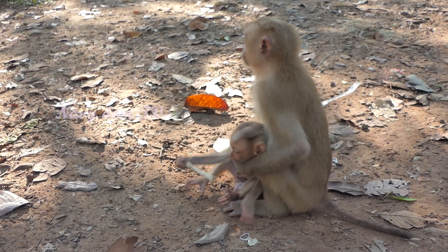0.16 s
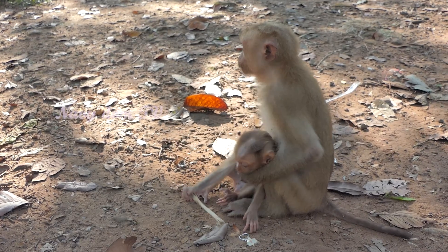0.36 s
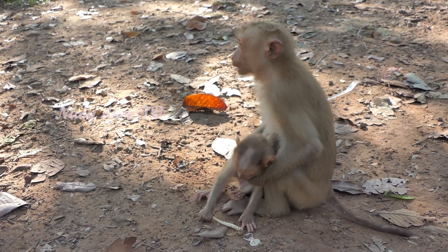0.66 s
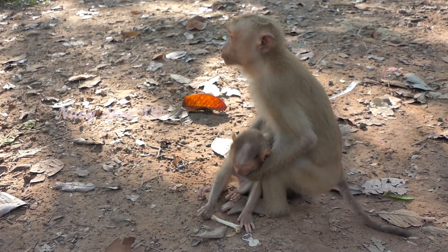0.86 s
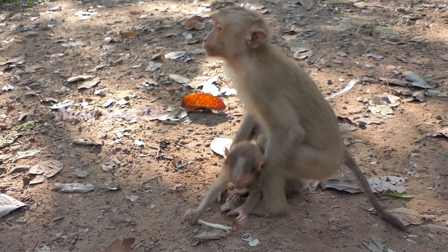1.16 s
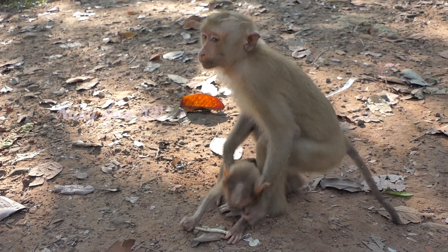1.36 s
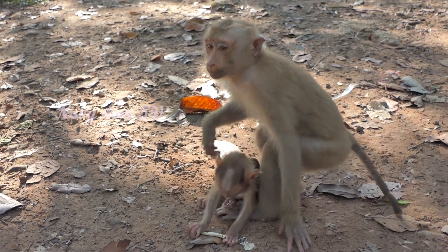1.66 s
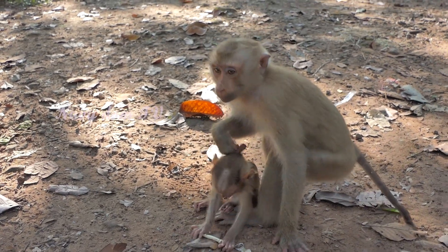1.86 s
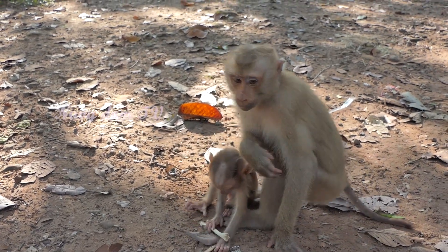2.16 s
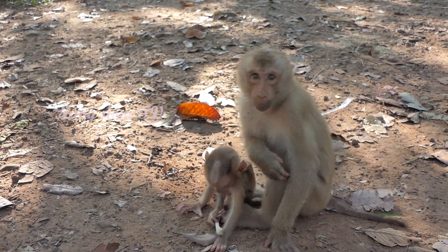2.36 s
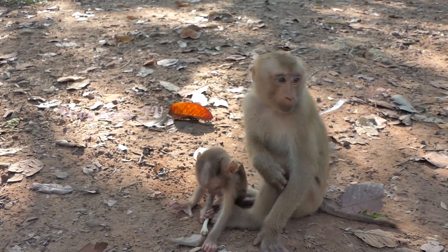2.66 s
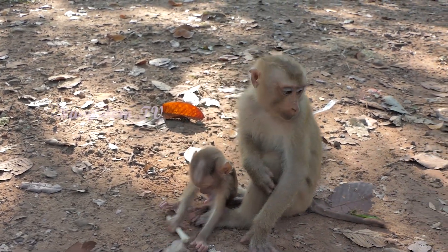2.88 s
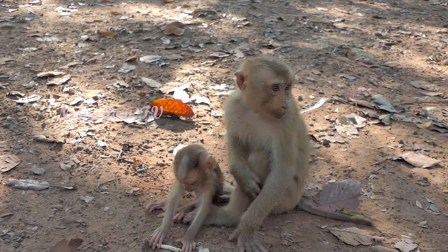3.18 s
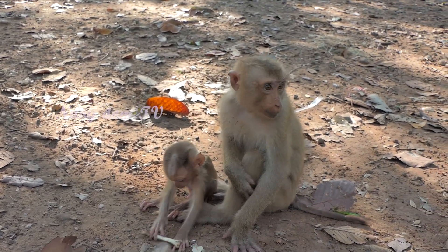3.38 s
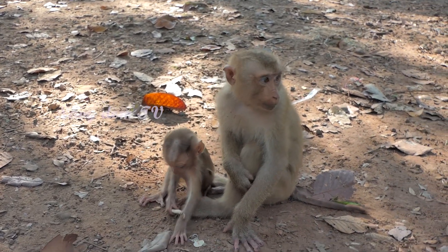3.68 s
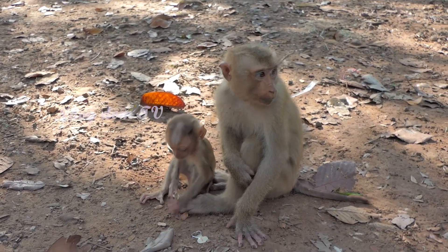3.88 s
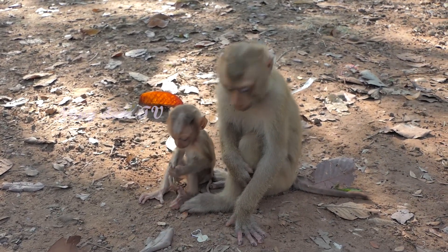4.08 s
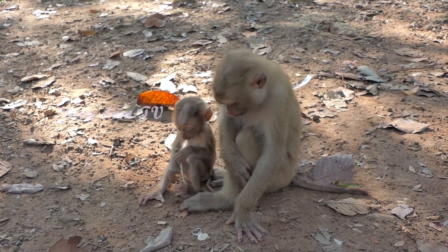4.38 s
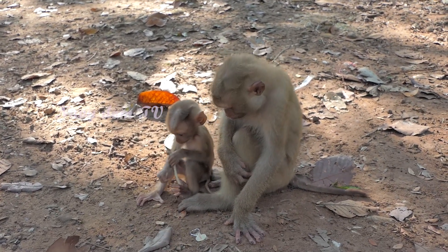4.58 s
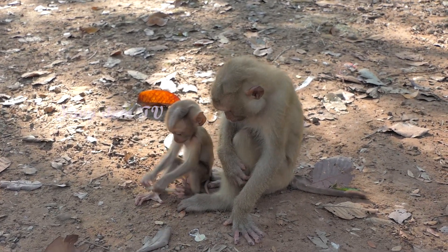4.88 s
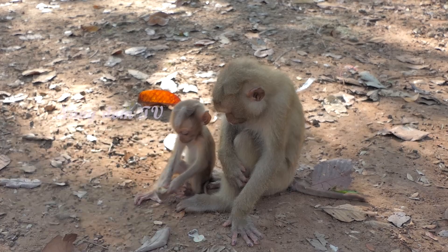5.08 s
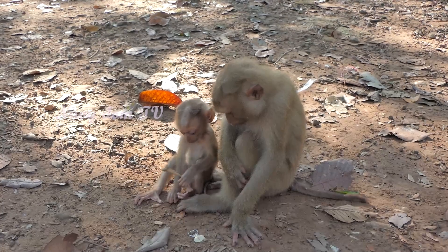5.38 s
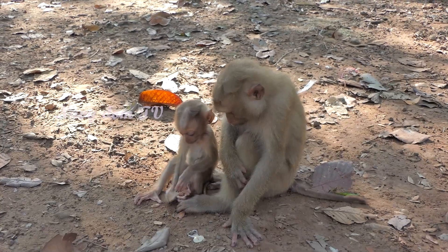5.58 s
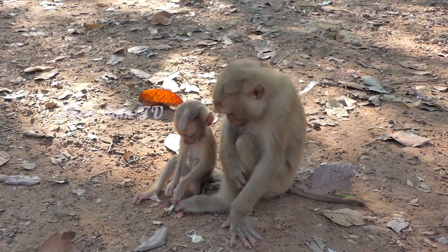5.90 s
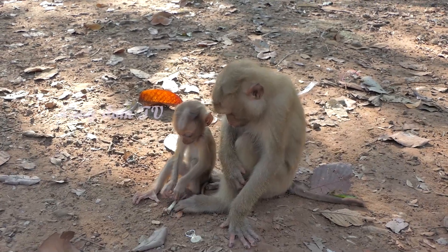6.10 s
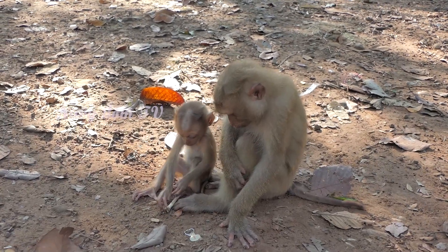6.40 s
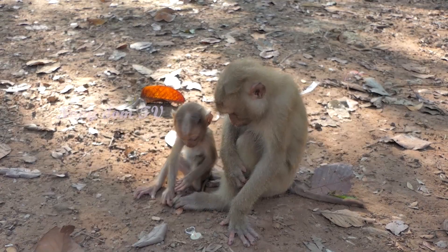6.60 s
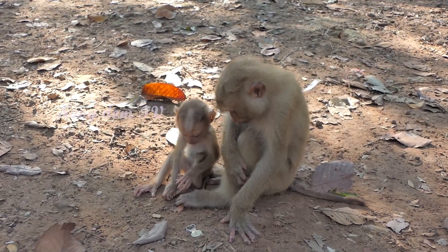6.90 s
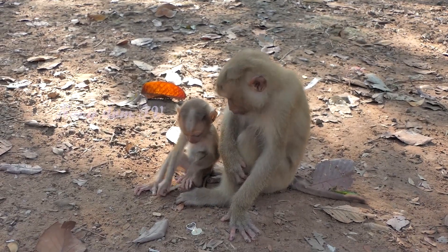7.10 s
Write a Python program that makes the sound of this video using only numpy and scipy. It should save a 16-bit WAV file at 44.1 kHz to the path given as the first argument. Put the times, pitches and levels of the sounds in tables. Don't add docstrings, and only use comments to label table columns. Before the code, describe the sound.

From 0 to about 7 seconds a dense cicada chorus dominates: a shrill, buzzing drone concentrated near 2.7 kHz with a brighter layer near 5.4 kHz, blurred and widened by the trees, almost constant in level and slightly more restless after 4.5. A rasping insect swells about twice a second, strongest near 1.2, 1.9 and 2.7. A higher hissing insect is steady, then surges at 4.0, 4.7, 5.2 and 5.55, more weakly at 6.0 and 6.9. Barely audible bird whistles come at 0.55 and 0.75, a short lower note at 3.37. A sharp, bright dry snap strikes at 2.0, a weaker one at 2.2. From 3.1 to 3.7 small twig knocks tick on the right; leaves brush at 3.6 and shuffle at 3.95 to 4.5, then only faint touches. A soft engine hum lies low on the right, beneath air and slight microphone hiss.

```python
import sys
import numpy as np
from scipy import signal
from scipy.fft import rfft, irfft, next_fast_len
from scipy.io import wavfile

SR = 44100
rng = np.random.default_rng(int(sys.argv[2]) if len(sys.argv) > 2 else 0)


def how_loud(loudness_db):
    steps = np.asarray(loudness_db, float) / 20
    return 10 ** steps


def wav_out(sig):
    wavfile.write(sys.argv[1], SR, np.round(np.clip(np.atleast_2d(sig).T, -1, 1) * 32767).astype(np.int16))


N = 319725
LEFT_RIGHT = np.array([[0.5], [-0.5]])


def along(points, hz):
    point_hz, value = np.transpose(points)
    return np.interp(np.log(hz + 1), np.log(point_hz + 1), value)


def curves(rows):
    time_s, *columns = np.transpose(rows)
    return [np.interp(np.arange(N) / SR, time_s, column) for column in columns]


def wobble(rate_hz):
    knots = rng.standard_normal(round(500 * N / SR))
    return np.interp(np.arange(N) * rate_hz / SR, np.arange(len(knots)), knots)


def filtered(x, response):
    size = next_fast_len(N + SR)
    return irfft(rfft(x, size) * response(np.fft.rfftfreq(size, 1 / SR)), size)[..., :N]


def shaped(x, body):
    return filtered(x, lambda hz: how_loud(along(body, hz)))


def swells(rows, rise_db_s, fall_db_s, rest_db):
    t = np.arange(N) / SR
    power = how_loud(2 * rest_db)
    for full_s, hold_s, level_db in rows:
        rise_db = rise_db_s * np.maximum(full_s - t, 0)
        fall_db = fall_db_s * np.maximum(t - full_s - hold_s, 0)
        power = power + how_loud(2 * (level_db - rise_db - fall_db))
    return np.sqrt(power)


# freq_hz, side_over_mid_db
SCATTER_WIDTH = [(2000, -7.5), (2700, -10), (4000, -6.5), (5400, -15.5), (8000, -13.5), (11000, -8),
                 (14000, -2)]


def trees(x, t60_s):
    hop = SR // 4
    out, t = np.zeros((2, N)), np.arange(SR // 2) / SR
    window = np.sin(np.pi * np.arange(2 * hop) / (2 * hop))
    for start in range(0, N, hop):
        piece = x[np.arange(start, start + 2 * hop) % N] * window
        cloud = rng.standard_normal((2, len(t))) * how_loud(-60 * t / t60_s)
        echo = signal.fftconvolve(piece[None], cloud, axes=1)
        out[:, np.arange(start, start + echo.shape[1]) % N] += echo
    mid, side = filtered(out, lambda hz: [hz * 0 + 1, how_loud(along(SCATTER_WIDTH, hz))])
    return np.array([mid + side, mid - side]) / np.std(mid)


# freq_hz, level_db
MIC_SPECTRUM = [(8000, -40), (11500, -8), (13000, -1), (15500, -1)]


def microphone_hiss():
    hiss = shaped(rng.standard_normal((2, N)), MIC_SPECTRUM)
    return how_loud(-59.0 + 2.6 * wobble(15)) * hiss / np.std(hiss)


# freq_hz, level_db
AIR_SPECTRUM = [(13, -61), (22, -27), (37, -16), (56, -6), (80, -2.5), (131, -3), (174, -14), (313, -15.5),
                (494, -23), (543, -19.5), (620, -20), (1380, -21), (1540, -21), (1700, -20.5), (2050, -23),
                (2660, -4), (4510, -120)]
# freq_hz, likeness_0_to_1
AIR_LIKENESS = [(60, 0.95), (130, 0.63), (290, 0.068), (640, 0.24), (1410, 0.45), (3100, 1), (6820, 0.93),
                (15000, 0.7)]
# freq_hz, left_over_right_db
AIR_BALANCE = [(60, -5), (130, -8.5), (290, 0), (640, -2), (1410, 1), (3100, -7), (6820, 0.5), (15000, 0.5)]


def air():
    def angle(hz):
        likeness = along(AIR_LIKENESS, hz) * np.clip(1.1 - hz / 3000, 0, 1)
        return np.arccos(np.clip(likeness, 0, 1)) / 2

    def mid_side(hz):
        return how_loud(along(AIR_SPECTRUM, hz)) * [np.cos(angle(hz)), np.sin(angle(hz))]

    mid, side = filtered(rng.standard_normal((2, N)), mid_side)
    pair = np.array([mid + side, mid - side])
    pair = filtered(pair, lambda hz: how_loud(along(AIR_BALANCE, hz) * LEFT_RIGHT))
    firing_hz = 72.4 + 1.004 * wobble(2.326)
    firing_db = -53.5 + 1.5 * wobble(4.5) + np.array([[-4], [3]])
    firing = np.sin(2 * np.pi * np.cumsum(firing_hz) / SR) * how_loud(firing_db)
    return how_loud(-47.5 + 0.5 * wobble(1.42)) * pair / np.std(pair.mean(0)) + firing


# start_s, length_s, pitch_hz, level_db
BIRD_NOTES = [
    (.55, .13, 1650, -61),
    (.75, 0.13, 1690, -62),
    (3.368, 0.054, 1384, -54),
]


def bird():
    t, out = np.arange(N) / SR, np.zeros(N)
    for start_s, length_s, pitch_hz, level_db in BIRD_NOTES:
        envelope = np.sin(np.pi * np.clip((t - start_s) / length_s, 0, 1))
        out += how_loud(level_db) * np.sin(2 * np.pi * pitch_hz * t) * envelope
    return out


# full_s, hold_s, level_db
RUSTLES = [
    (2.02, .02, -56),
    (2.97, .01, -54),
    (3.60, .01, -43),
    (3.95, 0.24, -48.5),
    (4.30, 0.19, -53),
    (5.17, .01, -57),
    (5.74, .01, -57),
]
# freq_hz, level_db
LEAF_BODY = [(300, -120), (600, -2.5), (2500, -2), (6000, 3), (10000, -11), (13000, -18), (15500, -19)]


def leaves():
    size_db = np.minimum(rng.exponential(size=N // 40 + 1), 3) * 3
    grains = rng.standard_normal(N) * how_loud(size_db.repeat(40)[:N])
    shuffle = swells(RUSTLES, rise_db_s=258, fall_db_s=127, rest_db=-71)
    return shuffle * trees(shaped(grains, LEAF_BODY), t60_s=0.025)


def knocks(rows, t60_s, pan_db):
    attack_s, puff_t60_s = 0.0006, 0.045
    out, t = np.zeros((2, N + SR)), np.arange(SR // 8) / SR
    puff_band = signal.butter(2, [0.02, 0.09], "band")
    for start_s, peak_db, pitch_hz, crack in rows:
        noise = signal.lfilter(*puff_band, rng.standard_normal((2, len(t))))
        puff = crack * noise * how_loud(-60 * t / puff_t60_s)
        ring = np.sin(2 * np.pi * pitch_hz * t) * how_loud(-60 * t / t60_s)
        knock = (ring + puff) * (1 - np.exp(-t / attack_s))
        out[:, round(start_s * SR):][:, :len(t)] += how_loud(peak_db + LEFT_RIGHT * pan_db) * knock
    return out[:, :N]


# start_s, peak_db, pitch_hz, crack_share
TWIG_TICKS = [(3.095, -36, 1830, 1.4), (3.109, -43, 1260, 2.5), (3.173, -32, 890, 1.8),
              (3.224, -43, 1310, 2.5), (3.337, -43, 910, 1.8), (3.384, -57, 1410, 2),
              (3.423, -40.5, 1380, 1.9), (3.579, -40.5, 524, 5.5), (3.603, -39.5, 1760, 8.4),
              (3.614, -41, 670, 2.9), (3.664, -39, 1330, 3)]


def twigs():
    return knocks(TWIG_TICKS, t60_s=0.026, pan_db=-5.5)


# start_s, peak_db, pitch_hz, crack_share
DRY_SNAPS = [
    (2.0118, -17, 4050, 0),
    (2.1884, -31, 3940, 0),
]


def snaps():
    return knocks(DRY_SNAPS, t60_s=0.012, pan_db=-0.5)


def scratchy(gain, body, stroke_hz, lift_db):
    turns = np.cumsum(stroke_hz * (1 + 0.04 * wobble(30))) / SR
    strokes = rng.standard_normal(N) * (0.15 + np.exp(-3 * (turns % 1)))
    return gain * how_loud(lift_db) * trees(shaped(strokes, body), t60_s=0.14)


# full_s, hold_s, level_db
RASP_SWELLS = [(.54, .03, -46.5), (.72, 0.051, -46.5), (1.22, 0.14, -40), (1.87, 0.074, -42),
               (2.14, 0.27, -48), (2.74, 0.19, -41.5), (3.40, .07, -42.5), (3.49, 0.16, -45.5),
               (4.02, 0.1, -42.5), (4.50, .1, -50.5), (4.72, .04, -48.5), (5.21, .04, -44),
               (5.45, 0.11, -58), (5.97, 0.14, -47.5)]
# freq_hz, level_db
RASPER_BODY = [(2300, -120), (2800, -2.5), (3300, 7), (3900, 5.5), (4400, 3.5), (4800, -8.5), (6500, -4),
               (10000, -12), (12000, -60)]


def rasper():
    gain = swells(RASP_SWELLS, rise_db_s=127, fall_db_s=44, rest_db=-62.5)
    return scratchy(gain, RASPER_BODY, stroke_hz=219.0, lift_db=2.5)


# time_s, level_db
HISS_LEVEL = [
    (0, -41),
    (1, -41.5),
    (3.5, -43.5),
    (7.25, -37),
]
# full_s, hold_s, level_db
HISS_SURGES = [
    (3.60, .01, -50),
    (3.98, 0.016, -36),
    (4.70, 0.023, -34.5),
    (5.20, 0.0089, -35),
    (5.55, .01, -33),
    (6.00, 0.044, -38),
    (6.90, 0.056, -39),
]
# freq_hz, level_db
HISSER_BODY = [(2600, -90), (2850, 0.5), (3200, -10), (3450, -22), (4700, -60), (5300, 11.5), (5650, 1.5),
               (6300, -8.5), (7000, -21), (7800, -6.5), (9000, -25), (10400, -16.5), (11300, -31),
               (11800, -92)]


def hisser():
    gain = swells(HISS_SURGES, rise_db_s=85, fall_db_s=86, rest_db=curves(HISS_LEVEL)[0])
    return scratchy(gain, HISSER_BODY, stroke_hz=291.0, lift_db=3.5)


# pulse_multiple, level_db
DRUM_CYCLE = [(1, -37), (2, -37), (3, -37), (4, -26.5), (5, 3), (6, -18.5), (7, -28.5), (8, -33), (9, -51),
              (10, 1), (11, -18), (12, -24.5), (13, -28.5), (14, -34), (15, -9.5), (16, -21), (17, -34),
              (18, -38), (19, -72.5), (20, -18), (21, -34), (22, -70), (23, -58), (24, -40), (25, -37.5),
              (26, -55)]
# pulse_hz, spread_hz, waver_hz, waver_rate_hz
SINGER_GROUPS = [
    (542.4, .9, 2.3, 22),
    (528, 3, 4, 30),
    (516, 7, 9, 40),
    (497, 9, 14, 60),
]
# level_db, weak_multiples_db
GROUP_LEVELS = [
    (1, 0.5),
    (-10.5, -13),
    (-10, -14),
    (-17.5, 2),
]
# time_s, waver_factor
RESTLESSNESS = [
    (0, .75),
    (3.4, .8),
    (4.6, 1.1),
    (5.5, 1.7),
    (7.25, 2.1),
]
# time_s, level_db, brightness_db
CHORUS_LEVEL = [(0, -30, 2.5), (1, -28.5, 0.5), (2, -29.5, 1.5), (3, -30.5, 3.5), (4, -29, 0.5),
                (5, -28, 0), (6, -30, 0.5), (7.25, -31.5, 1)]


def cicadas():
    singers_per_group, cycle_size = 7, 32768
    order, order_db = np.transpose(DRUM_CYCLE)
    harmonic = np.round(order).astype(int)
    song, (unrest,) = np.zeros(N), curves(RESTLESSNESS)
    for group, (level_db, weak_db) in zip(SINGER_GROUPS, GROUP_LEVELS):
        pulse_hz, spread_hz, waver_hz, waver_rate_hz = group
        strength = how_loud(order_db + weak_db * (harmonic % 5 > 0)) * (order > 3.5)
        for place in np.linspace(-1.5, 1.5, singers_per_group):
            spectrum = np.zeros(cycle_size // 2 + 1, complex)
            spectrum[harmonic] = strength * np.exp(2j * np.pi * rng.random(len(order)))
            wander_hz = unrest * (waver_hz * wobble(waver_rate_hz) + 3 * wobble(400))
            turns = np.cumsum(pulse_hz + spread_hz * place + wander_hz) / SR
            stroke = 1 + 0.55 * wobble(120) + 0.22 * wobble(450)
            effort = how_loud(level_db + 1.03 * wobble(9)) * stroke
            song += effort * irfft(spectrum)[(turns % 1 * cycle_size).astype(int)]
    chorus_db, bright_db = curves(CHORUS_LEVEL)
    chorus = trees(song, t60_s=0.83)
    low = filtered(chorus, lambda hz: hz < 4000)
    high = chorus - low
    low, high = low / np.std(low.mean(0)), high / np.std(high.mean(0))
    return how_loud(chorus_db + 0.34 * LEFT_RIGHT) * (low + how_loud(bright_db + 0.5) * high)


def scene():
    background = air() + bird()
    monkeys = leaves() + twigs() + snaps()
    return background + monkeys + rasper() + hisser() + cicadas()


def band_limit(x):
    return signal.sosfilt(signal.butter(12, 15610, fs=SR, output="sos"), x)


def record(dry):
    heard = dry + microphone_hiss()
    return band_limit(heard)


dry = scene()
out = record(dry)
wav_out(out)
```